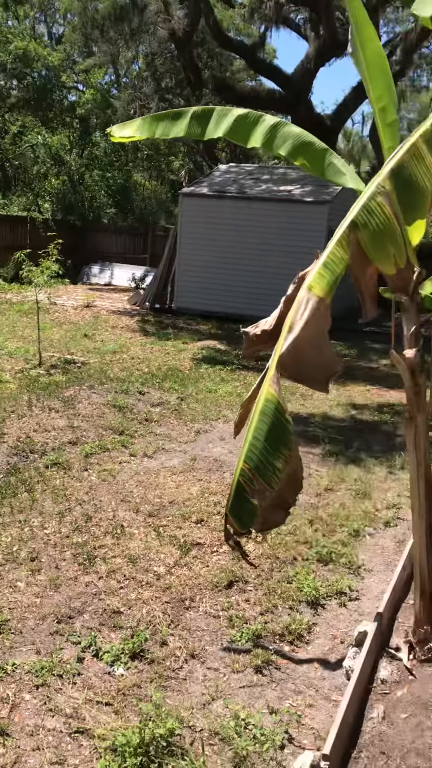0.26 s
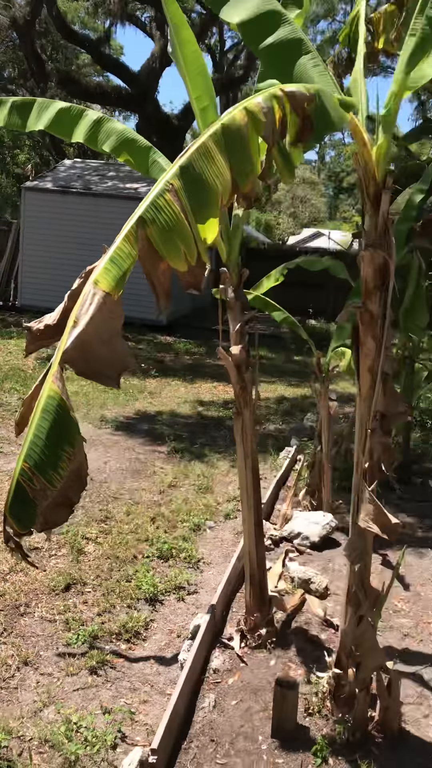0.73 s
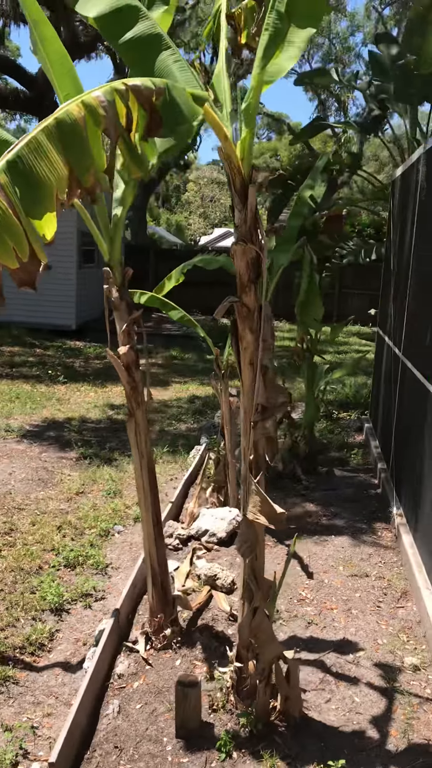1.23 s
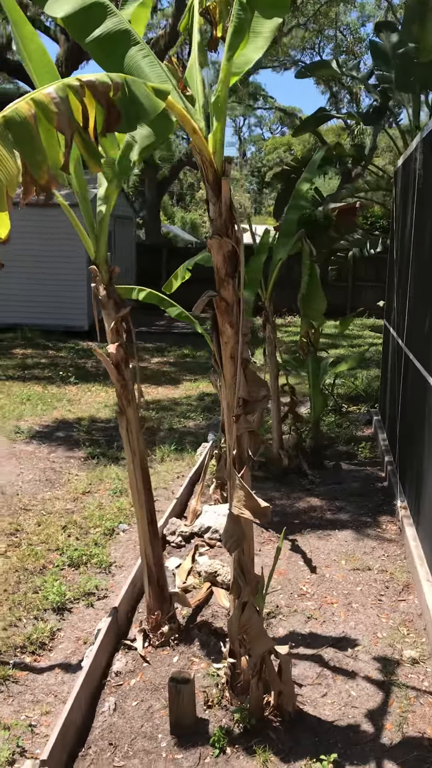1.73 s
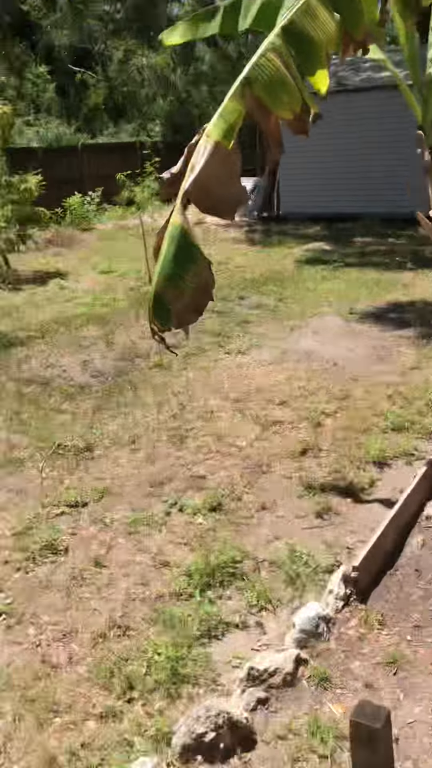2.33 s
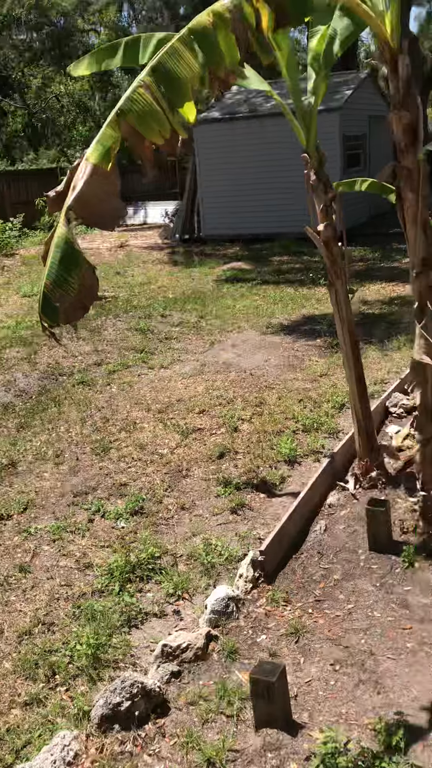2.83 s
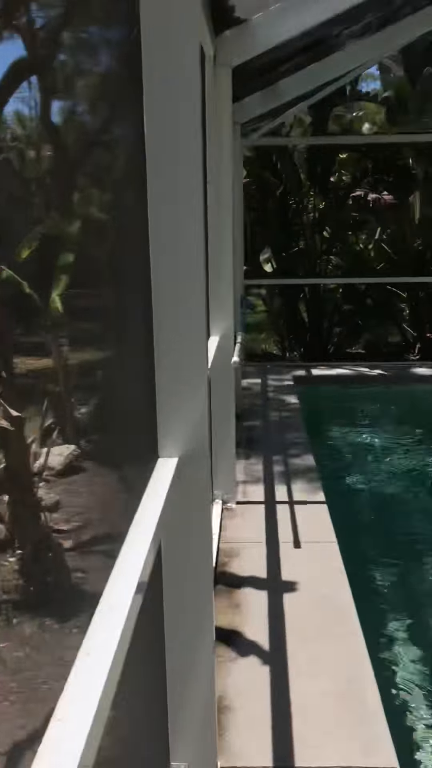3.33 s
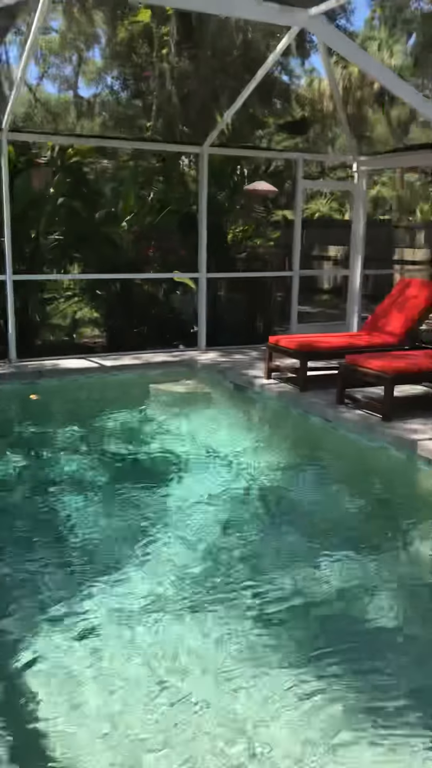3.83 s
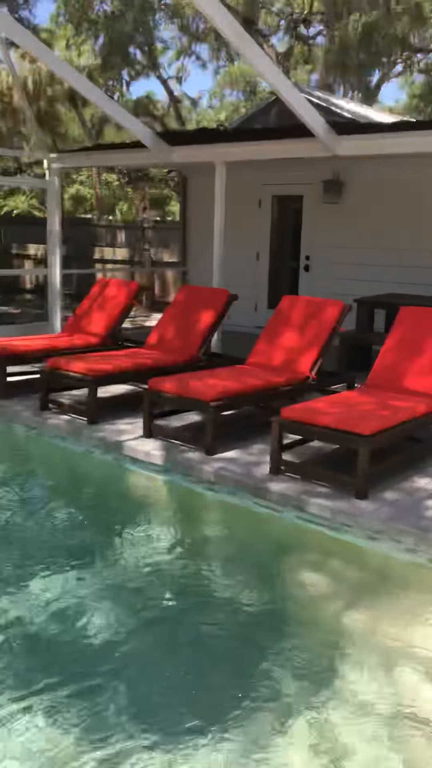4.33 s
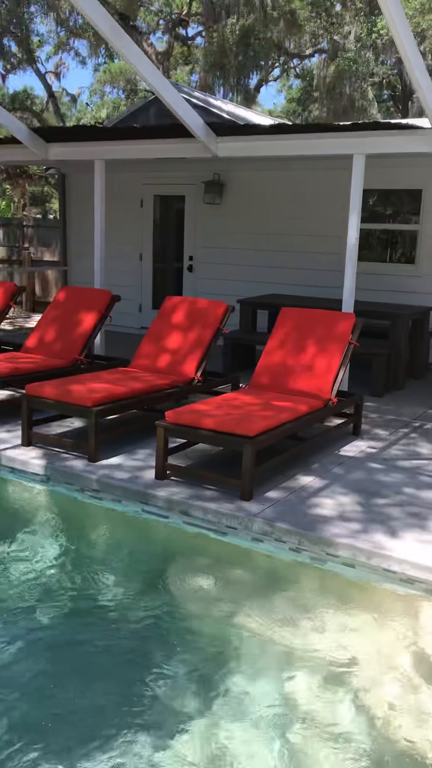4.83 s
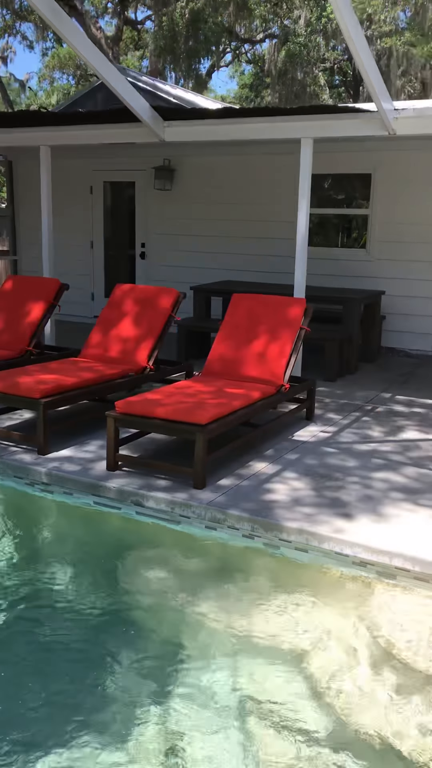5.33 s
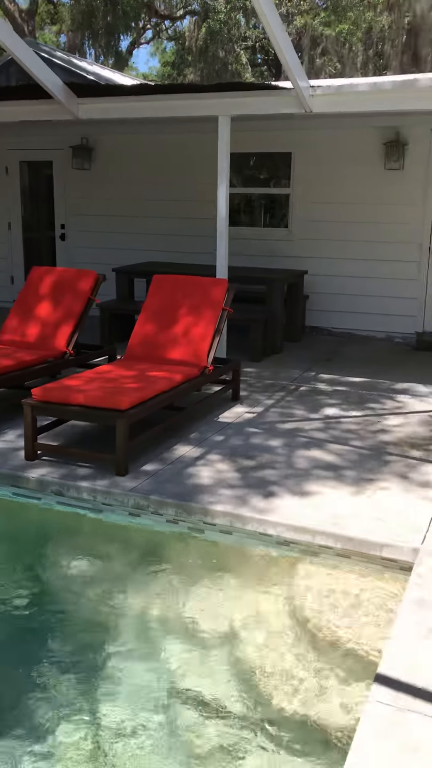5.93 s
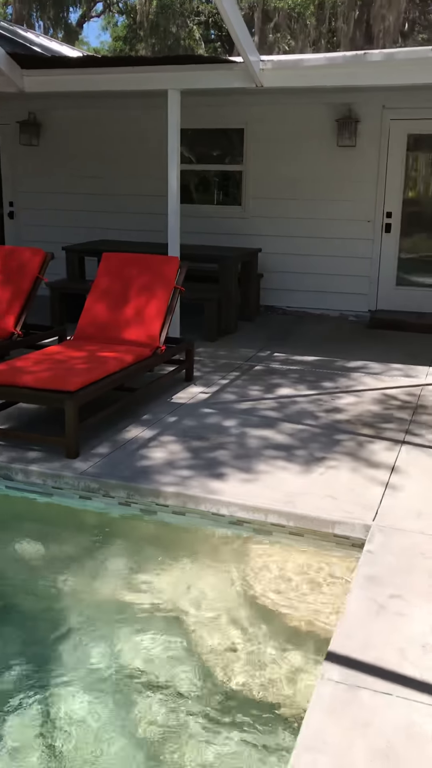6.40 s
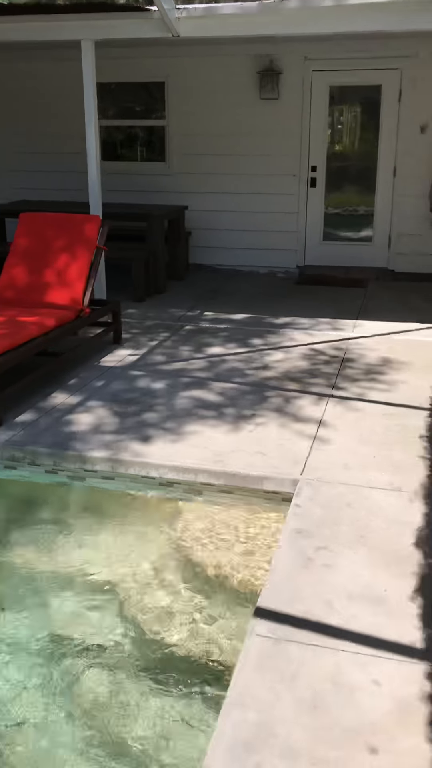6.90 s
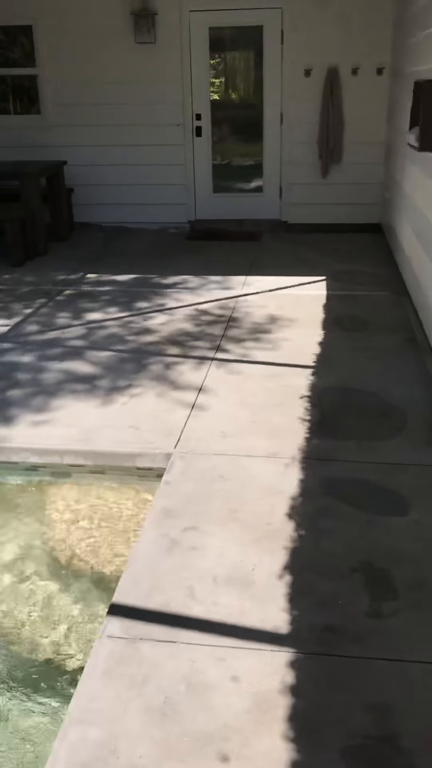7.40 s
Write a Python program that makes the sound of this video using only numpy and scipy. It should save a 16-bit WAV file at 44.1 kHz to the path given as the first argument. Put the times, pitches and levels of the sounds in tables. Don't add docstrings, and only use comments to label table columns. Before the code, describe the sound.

A quiet yard with faint motor hum and small gritty footsteps, then a light metal screen door slams loudly, rattles and rebounds beside a house.

```python
import sys
import numpy as np
from scipy import signal
from scipy.fft import rfft, irfft
from scipy.io import wavfile
from scipy.ndimage import uniform_filter1d

SR = 44100
rng = np.random.default_rng(int(sys.argv[2]) if len(sys.argv) > 2 else 0)


def gain_from_db(level_db):
    decades = np.asarray(level_db, float) / 20
    return 10 ** decades


def store_wav(level_fs):
    pcm = np.round(np.clip(np.atleast_2d(level_fs), -1, 1) * 32767)
    wavfile.write(sys.argv[1], SR, pcm.T.astype(np.int16))


N = 337572
T = np.arange(N) / SR

# frequency [Hz], density [dB per Hz].
YARD_SPECTRUM = [(20, -32.5), (45, -3), (80, -1), (134, -7), (250, -4.5), (480, -17.5), (1000, -14),
                 (1500, -23.5), (2300, -29.5), (4200, -33), (8700, -38.5), (12000, -44), (16000, -49.5)]
# time [s], cover [1 takes 6 dB off the bass; below 0 lets more in].
HOUSE_SHELTER = [(0, 0.13), (.8, -0.19), (1.8, -0.11), (2.15, -0.39), (3.8, 0.14), (4.9, -0.2), (5.7, 0.46),
                 (7.0, 0.16), (7.65, 0.94)]
# time [s], stir [0-1].
LEAF_STIR = [(0, 0.04), (1.55, 0), (1.85, 0.2), (2.1, 0.8), (2.7, 0.26), (3.05, 0.53), (3.55, 0.86),
             (3.8, 0.6), (4.3, 0.56), (4.8, 0.43), (5.3, 0.27), (5.7, 0.38), (6.0, 0.55), (7.0, 0.77),
             (7.65, 0.64)]
# time [s], level [dB].
MOTOR_LOAD = [(0.0, -59), (2.14, -57), (2.21, -51), (2.72, -62), (2.76, -51), (4.91, -52), (4.97, -62),
              (5.68, -47.5), (5.84, -65), (5.99, -48.5), (6.35, -52)]
# start [s], peak [dB], ring [Hz].
LEAF_SNAPS = [(0.5427, -51.5, 5360), (2.784, -39, 9800), (2.8946, -43, 3930), (2.973, -51, 6490),
              (3.2268, -46, 7100), (3.479, -44, 5130), (3.5105, -44, 3900), (3.587, -48, 4080),
              (3.613, -38, 4340), (3.665, -35, 6030), (3.9973, -39, 3740), (4.0068, -48, 5410),
              (4.0262, -39, 4540), (4.1959, -48, 4060), (4.5261, -49, 11700), (4.7012, -50, 12600),
              (4.7875, -53, 12100), (4.8434, -44.5, 6300), (4.9182, -50, 5330), (4.9472, -47, 15200),
              (5.38, -38.5, 6650), (5.9219, -46, 4180), (5.9618, -48, 8500), (5.975, -41, 3800),
              (6.0437, -50, 5780), (6.0565, -46, 7060), (6.1855, -39.5, 3780), (6.7318, -41, 4300),
              (7.319, -41, 5280)]
# start [s], peak [dB], ring [Hz].
GRIT_GRAINS = [(1.555, -45, 6210), (2.0512, -49, 4100), (2.0936, -45, 3540), (2.476, -54, 10000),
               (2.722, -46, 4450), (3.3034, -49, 5110), (3.6174, -50, 13300), (3.8546, -39, 8950),
               (3.8776, -37.5, 4360), (3.9963, -45, 11100), (4.0267, -44, 9800), (4.0696, -45, 7600),
               (4.1228, -36.5, 7080), (4.4214, -56, 11300), (4.533, -40, 3320), (4.591, -38.5, 4800),
               (4.6478, -45, 5870), (4.6818, -49, 5590), (4.7296, -40, 4100), (4.7873, -42, 3460),
               (4.831, -50, 8120), (4.994, -49, 8090), (5.6381, -45, 6440), (5.6803, -47, 7280),
               (6.841, -33, 7100), (6.9112, -35.5, 4800), (7.2384, -43, 6500), (7.251, -43, 6130),
               (7.3637, -45, 6650)]
# start [s], peak [dB], ring [Hz].
PEBBLE_KNOCKS = [(0.9564, -49.5, 2830), (0.9667, -53, 1610), (2.2676, -46, 1800), (2.4049, -44.5, 1680),
                 (2.5172, -47.5, 2680), (2.6567, -37.5, 1750), (3.2268, -43, 2110), (3.4645, -46, 1730),
                 (3.5877, -47, 2020), (3.6082, -47, 3080), (3.6644, -42, 2470), (3.7688, -39, 3530),
                 (3.8566, -47, 3760), (3.9414, -46, 2570), (4.0033, -47, 2300), (4.1964, -45, 2140),
                 (4.5336, -49, 2690), (4.6379, -51, 3500), (4.896, -46, 2490), (4.9945, -48.5, 2980),
                 (6.0554, -49, 2310), (7.4929, -48, 2830)]
# start [s], peak [dB], ring [Hz].
HEEL_THUMPS = [(2.149, -30.5, 355), (4.132, -36, 530), (4.157, -32.5, 1077), (4.273, -28, 114),
               (4.788, -38.5, 563), (4.839, -30, 92)]
# start [s], level [dB], time to fall 60 dB [s].
BIRD_CHIPS = [
    (2.228, -46.5, .12),
    (2.255, -49, 0.26),
    (2.385, -61, .12),
]
# start [s], level [dB], time to fall 60 dB [s], frequency [Hz].
FAR_ANSWERS = [(1.68, -66, .5, 9500), (2, -69, 1.2, 7000), (3.1, -66, 1.2, 9400), (3.1, -70, 1.2, 11200)]
# start [s], length [s], level [dB], centre [Hz], hiss re centre [dB].
SOLE_SLIDES = [(2.088, 0.069, -55, 3480, 5), (3.132, 0.086, -64, 9000, -6), (3.338, .2, -64.5, 10500, -12),
               (3.6, 0.093, -58.5, 2500, -3), (4.152, 0.03, -55.5, 2470, -7), (5.916, 0.032, -56, 6000, 4)]
# start [s], length [s], level [dB], centre [Hz], hiss re centre [dB].
LATCH_SCRAPES = [
    (6.3, .06, -60, 9000, -3),
    (6.336, 0.14, -43, 885, -2),
    (6.353, 0.039, -45.5, 1800, 6),
    (6.39, 0.041, -25.5, 2100, 1.5),
    (6.405, 0.069, -29.5, 1230, -22),
    (7.022, 0.054, -44.5, 990, -23),
    (7.044, 0.037, -45.5, 1870, -2.5),
]
# start [s], peak [dB], treble re frame [dB], thud re frame [dB].
DOOR_BLOWS = [
    (6.443, -4.5, -10.5, -12),
    (6.626, -17, -33.5, -17),
    (6.75, -21, -33, -13.5),
    (6.881, -35, -36, -5.5),
    (7.095, -25.5, -25.5, -5.5),
    (7.235, -34, -39, -8),
    (7.313, -41, -18, 0),
    (7.365, -49, -38, -4),
]
# frequency [Hz], strength [dB], undamped time to fall 60 dB [s].
FRAME_MODES = [(651, 3.5, 0.43), (776, -6, 2.1), (1004, 9, 0.055), (1140, 6, 0.2), (1260, -0.5, 0.63),
               (1580, -9, 0.37), (1800, -8, 0.28), (1920, 4.5, 0.19), (2203, 4.5, 0.17), (2140, -23, 0.38),
               (2280, -4, 0.24), (2785, -23, 0.36), (2900, -19, 0.17), (3060, -4, 0.23), (3030, -25, 0.23),
               (3276, -3, 0.26), (3440, -2, 0.28), (3870, -23, 0.47), (3800, 1.5, 0.22), (4130, 2, 0.11),
               (4280, -12, 0.12), (4230, -28, 0.28)]
# frequency [Hz], density [dB per Hz].
CRASH_SPECTRUM = [(290, -40), (500, -9.5), (936, -4), (1040, 2), (1270, -2), (1700, -9.5), (3050, -6.5),
                  (4860, -18.5), (8710, -22), (12700, -30.5), (14700, -22), (16300, -46)]
# start [s], time until the catch stops it [s], boom [dB], second mode [dB].
LEAF_SWINGS = [(6.447, .35, -23.5, -26.5), (6.875, 0.094, -38.5, -43.5), (7.04, 0.055, -50, -42),
               (7.095, 0.095, -36.5, -36), (7.23, .06, -37.5, -39), (7.37, 0.15, -55, -53)]
# start [s], level [dB], time to fall 60 dB [s].
PANEL_BUZZES = [(6.446, -16, 0.14), (6.5, -26.5, 0.32), (7.096, -29, 0.21), (7.16, -46, 0.95),
                (7.236, -42, 0.32), (7.37, -45, 0.18)]
# frequency [Hz], time to fall 60 dB [s].
TAIL_DECAYS = [(150, 0.87), (1000, 0.54), (4000, 0.45), (12000, 0.35)]
# frequency [Hz], width [Hz], depth [dB].
CASE_DIPS = [(10500, 940, -4), (4950, 230, -2)]


def unit(x):
    return x / np.sqrt(np.mean(x ** 2))


def band(x, hz, width_hz):
    f = np.fft.rfftfreq(len(x), 1 / SR)
    return irfft(rfft(x) * np.exp(-2 * ((f - hz) / width_hz) ** 2), len(x))


def colour(x, table):
    hz, db = np.transpose(table)
    f = np.fft.rfftfreq(len(x), 1 / SR) + 1
    return irfft(rfft(x) * gain_from_db(np.interp(np.log(f), np.log(hz), db)), len(x))


def walk(rate):
    hold = int(SR / rate)
    steps = np.repeat(rng.standard_normal(N // hold + 1), hold)
    w = uniform_filter1d(uniform_filter1d(steps, hold), hold)[:N]
    return w / w.std()


def fade(t, t60):
    return np.exp(-np.log(1000) * t / t60)


def strike(s, rise_s, t60):
    t = np.maximum(T - s, 0)
    return (1 - np.exp(-(t / rise_s) ** 2)) * fade(t, t60)


def glide(hz):
    return np.sqrt(2) * np.sin(2 * np.pi * np.cumsum(hz) / SR)


def add(out, s, x):
    i = int(s * SR)
    out[i:i + len(x)] += x[:len(out) - i]


def yard():
    shelter = np.interp(T, *np.transpose(HOUSE_SHELTER))
    stir = np.interp(T, *np.transpose(LEAF_STIR)) - .5
    swell_hz = [250, 900, 3500, 10000]
    swell_db = np.array([-6 * shelter + 1.26 * walk(4.04), -2.5 * shelter + 0.3 * walk(4.07),
                         6 * stir + 0.71 * walk(7.9), 7 * stir + 1.4 * walk(7)])
    murmur = colour(rng.standard_normal(N), YARD_SPECTRUM)
    out = np.zeros(N)
    for hz in 28 * 2 ** np.arange(0, 9.6, .5):
        place = np.interp(np.log(hz), np.log(swell_hz), np.arange(4))
        lower = min(int(place), 2)
        db = swell_db[lower] + (place - lower) * (swell_db[lower + 1] - swell_db[lower])
        flicker_db = 2.5 * (hz / 100) ** -.2 * walk(8)
        out += band(murmur, hz, hz * 0.36) * gain_from_db(db + flicker_db)
    return unit(out) * gain_from_db(-46.5)


def motors():
    upper_hz, lower_hz = 106.2, 58
    turn_s, turn_length_s, upper_gone_s = 2.08, 0.12, 3.88
    turned = np.clip((T - turn_s) / turn_length_s, 0, 1)
    upper_db = -46.5 - 1.2 * T - 6.5 * turned + 0.51 * walk(8.5)
    upper = np.sqrt(2) * np.sin(2 * np.pi * upper_hz * T) * gain_from_db(upper_db)
    upper *= np.clip((upper_gone_s - T) / turn_length_s, 0, 1)
    lower_db = -2.5 + np.interp(T, *np.transpose(MOTOR_LOAD)) + 3.5 * walk(10)
    return upper + glide(lower_hz + 3.06 * walk(11.0)) * gain_from_db(lower_db)


def falling_dust():
    start_s, end_s, low_hz, high_hz = 2.6, 6.3, 3500, 12000
    when, level, pitch = rng.random((3, 30))
    return np.c_[start_s + (end_s - start_s) * when, -58 - 2 * np.log(1 - level),
                 low_hz * (high_hz / low_hz) ** pitch]


def grit():
    out, t = np.zeros(N), T[:SR // 8]
    # rows, snap re ring in dB, ring t60 in s
    kinds = [(LEAF_SNAPS, 2.7, 0.0067), (GRIT_GRAINS, -4, 0.007), (PEBBLE_KNOCKS, -15, .025),
             (HEEL_THUMPS, -30, 0.041), (falling_dust(), 0, .006)]
    for rows, snap_db, t60 in kinds:
        for s, db, hz in rows:
            snap = band(rng.standard_normal(len(t)) * np.exp(-t / 0.0007), hz + 800, 8000)
            snap *= 1.11 / np.abs(snap).max()
            tone = np.sin(2 * np.pi * hz * t) * fade(t, t60) * (1 - np.exp(-t * hz * 3.1))
            add(out, s, gain_from_db(db) * (tone + gain_from_db(snap_db) * snap))
    return out


def bird():
    attack_s, tail_db, tail_t60, end_s = 0.0043, -11.5, 0.84, 2.52
    level = np.zeros(N)
    for s, db, t60 in BIRD_CHIPS:
        tail = gain_from_db(tail_db) * strike(s, attack_s, tail_t60)
        level += gain_from_db(db) * (strike(s, attack_s, t60) + tail)
    level *= fade(np.maximum(T - end_s, 0), .5)
    out = unit(band(rng.standard_normal(N), 7080, 320)) * level
    for s, db, t60, hz in FAR_ANSWERS:
        note = unit(band(rng.standard_normal(SR), hz, 700))
        add(out, s, gain_from_db(db) * note * strike(0, .02, t60)[:SR])
    return out


def scrapes():
    out = np.zeros(N)
    for rows, relative_width in ((SOLE_SLIDES, 0.99), (LATCH_SCRAPES, 0.68)):
        for s, length, db, hz, hiss_db in rows:
            u = T[:SR // 4] / length
            noise = rng.standard_normal(len(u)) * gain_from_db(1.8 * walk(500)[:len(u)])
            hiss = gain_from_db(hiss_db) * unit(band(noise, 5100, 10200)) * np.exp(-1.5 * u)
            grind = unit(band(noise, hz, relative_width * hz)) + hiss
            add(out, s, gain_from_db(db) * grind * (1 - np.exp(-u / 0.16)) * np.exp(-1.5 * u ** 2))
    return out


def ring(modes, t, scatter_db):
    hz, db, t60 = np.transpose(modes)[:, :, None]
    strength, detune = rng.standard_normal((2, len(modes), 1))
    tone = np.sin(2 * np.pi * hz * (1 + 0.012 * detune) * t)
    y = gain_from_db(db + scatter_db * strength) * tone * fade(t, t60)
    return y.sum(axis=0) / np.sqrt(np.sum(gain_from_db(2 * db)))


def door():
    out, t = np.zeros(N), T[:SR // 2]
    rattle_hz, rail_hz = 1145, 1200
    rail = gain_from_db(-18) * np.sin(2 * np.pi * rail_hz * t) * fade(t, 0.17)
    for s, db, treble_db, thud_db in DOOR_BLOWS:
        rattle_ms = max(26 + 0.15 * treble_db, 2)
        shake = np.exp(-(t * 1000 / rattle_ms) ** 1.8) * (1 - np.exp(-t / 0.00076))
        jangle = gain_from_db(-27.0) * fade(t, 0.8)
        contacts = rng.standard_normal(len(t)) * rng.exponential(size=len(t)) * (shake + jangle)
        contacts /= np.sqrt(np.sum(contacts ** 2))
        modes = [(hz, mode_db + 0.2 * treble_db * max(np.log2(hz / rattle_hz), 0), min(.2 * t60, .06))
                 for hz, mode_db, t60 in FRAME_MODES]
        frame = signal.fftconvolve(ring(modes, t, scatter_db=3.0) + rail, contacts)[:len(t)]
        crash = unit(colour(rng.standard_normal(len(t)), CRASH_SPECTRUM))
        sizzle = unit(band(crash, 10400, 7950))
        dull = unit(band(crash, rattle_hz, 1.5 * rattle_hz))
        dull += gain_from_db(0.3 * treble_db - 1.5) * unit(band(crash, 3900, 4100))
        rattle = gain_from_db(-13.0) * dull * (shake + jangle)
        rattle += gain_from_db(treble_db - 6.0) * sizzle * (shake + 0.36 * jangle)
        thud = unit(band(rng.standard_normal(len(t)), 228, 410))
        thud *= fade(t, 0.27) * (1 - np.exp(-(t / 0.018) ** 2))
        add(out, s, gain_from_db(db) * (gain_from_db(-3.5) * frame + rattle + gain_from_db(thud_db) * thud))
    return out


def leaf():
    rise_s, choke_s = 0.026, .025
    boom, second, panel = np.zeros((3, N))
    for s, free_s, boom_db, second_db in LEAF_SWINGS:
        free = 1 / (1 + np.exp(np.clip((T - s - free_s) / choke_s * 2, -50, 50)))
        boom += gain_from_db(boom_db) * strike(s, rise_s, 1.8) * free
        second += gain_from_db(second_db) * strike(s, rise_s, 0.6) * free
    for s, db, t60 in PANEL_BUZZES:
        panel += gain_from_db(db) * strike(s, 0.0094, t60)
    panel *= gain_from_db(2.0 * walk(60))
    low = glide(87.6 + 1.4 * walk(10)) * boom + glide(147.7 + 3 * walk(15)) * second
    return low + glide(373 + 7 * walk(40)) * panel


def insect():
    hz = 5800 + 2400 * np.maximum(T - 7.15, 0)
    rasp = unit(band(rng.standard_normal(N), 0, 950))
    return rasp * glide(hz) * gain_from_db(-70.5) * np.clip((T - 6.95) / 0.18, 0, 1)


def space(x):
    t = T[:SR]
    tail = sum(band(rng.standard_normal(SR), hz, 2.9 * hz) * fade(t, t60) for hz, t60 in TAIL_DECAYS)
    tail *= (1 - np.exp(-t / 0.014)) * gain_from_db(-6.5) / np.sqrt(np.sum(tail ** 2))
    slap = rng.standard_normal(SR // 100) * np.exp(-t[:SR // 100] / 0.00084)
    wall_s = .050
    add(tail, wall_s, gain_from_db(-10.5) * slap / np.sqrt(np.sum(slap ** 2)))
    return signal.fftconvolve(x, tail)[:N]


def scene():
    slam, steps = door() + scrapes(), grit()
    near = slam + leaf() + steps + space(slam + 0.36 * steps)
    return (near + bird() + insect() + motors() + yard())[None]


def band_limit(x):
    return signal.sosfilt(signal.butter(12, 16670, fs=SR, output="sos"), x)


def record(dry):
    for hz, width_hz, db in CASE_DIPS:
        dry = dry - (1 - gain_from_db(db)) * band(dry[0], hz, width_hz)
    dry = signal.sosfilt(signal.butter(2, 40, "high", fs=SR, output="sos"), dry)
    dry = signal.sosfilt(signal.ellip(8, .2, 70, 16200, fs=SR, output="sos"), dry)
    return band_limit(dry)


dry = scene()
out = record(dry)
store_wav(out)
```